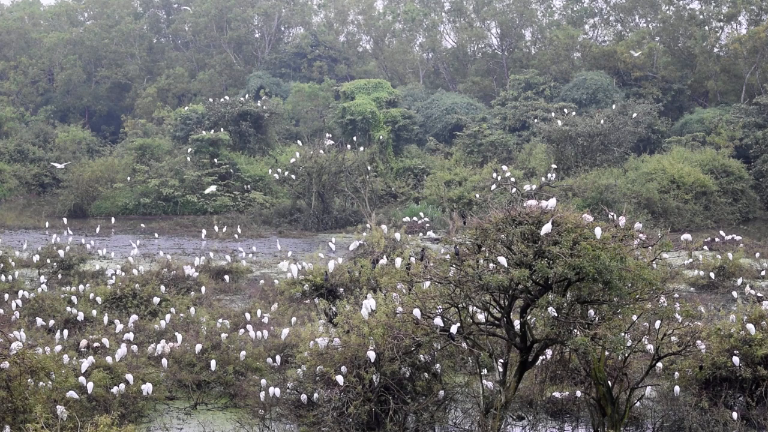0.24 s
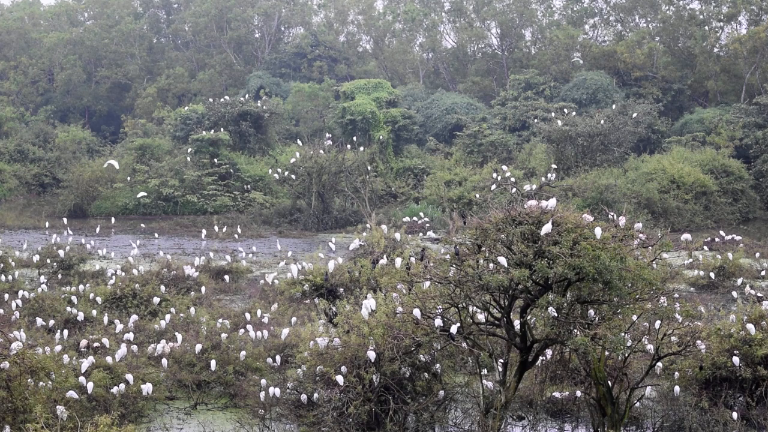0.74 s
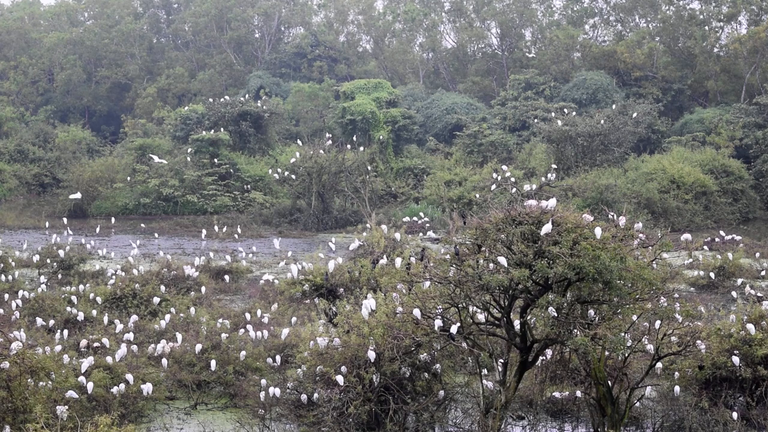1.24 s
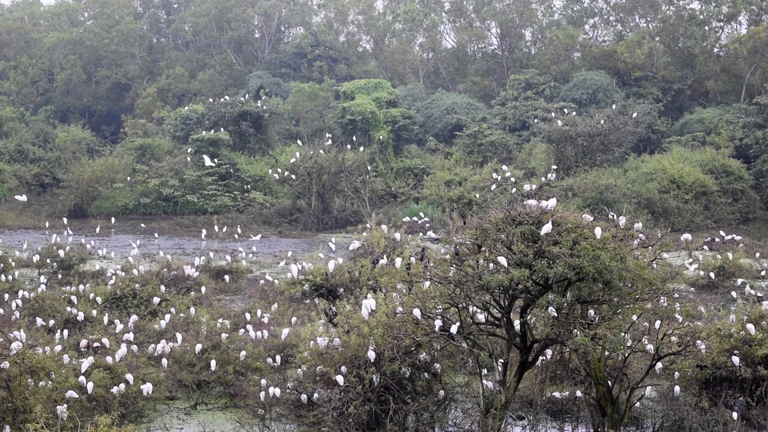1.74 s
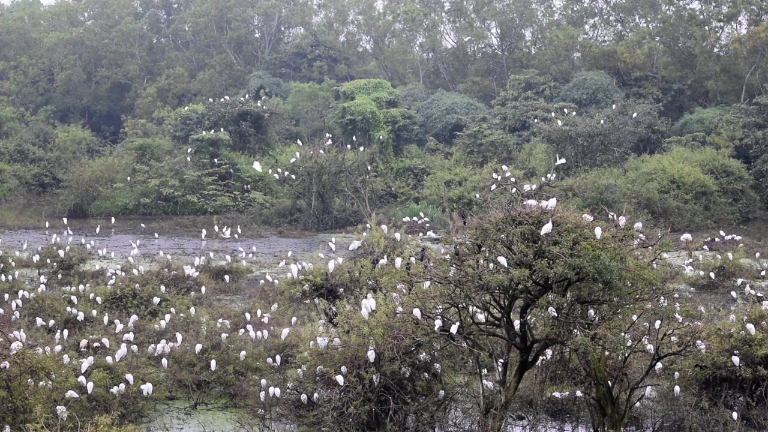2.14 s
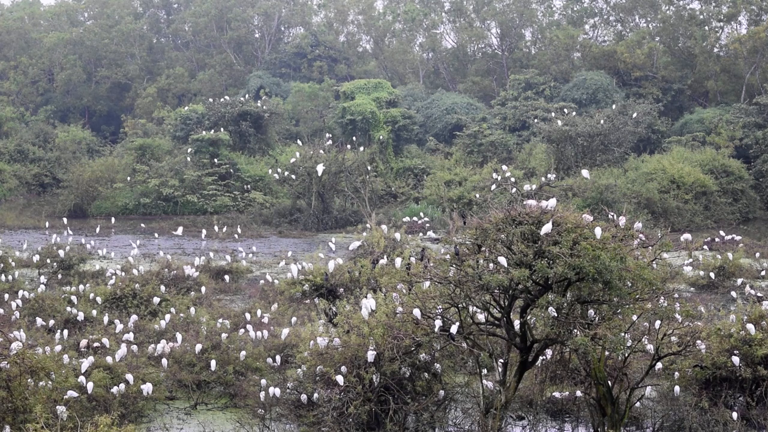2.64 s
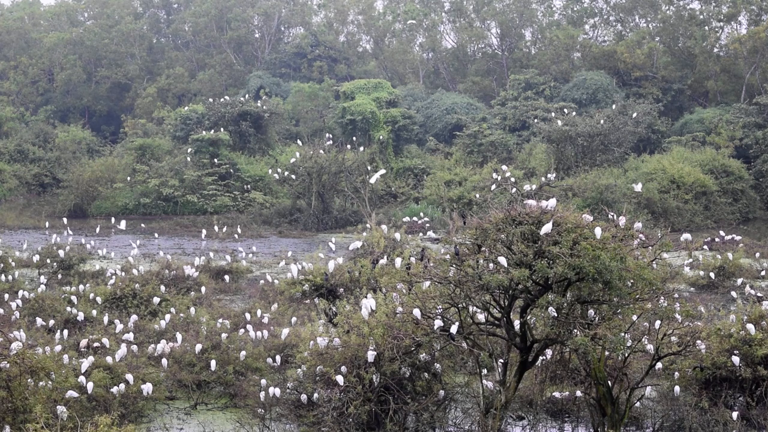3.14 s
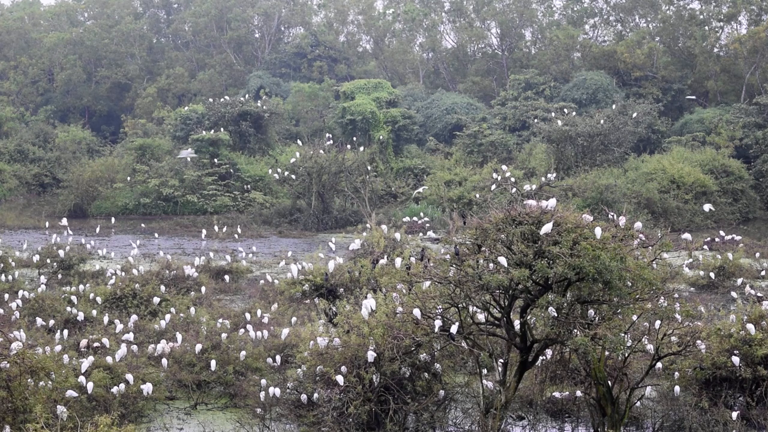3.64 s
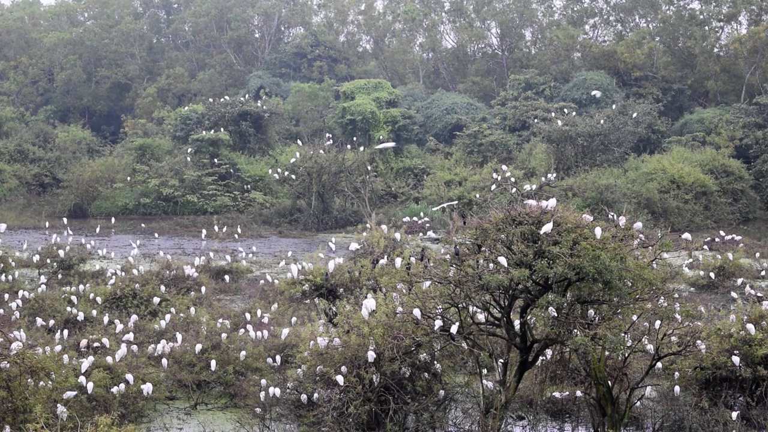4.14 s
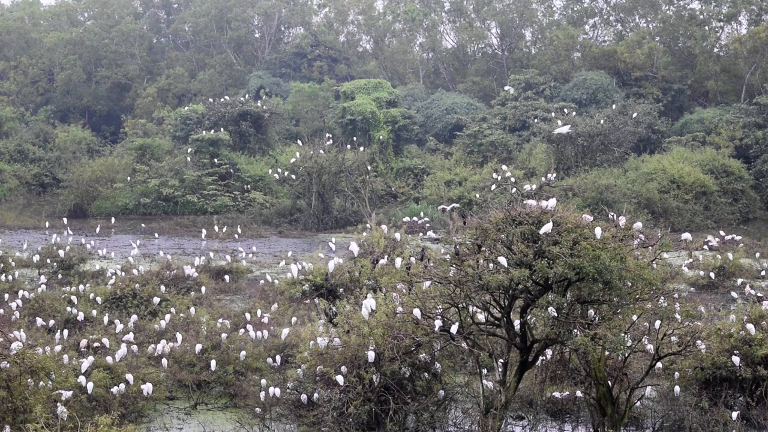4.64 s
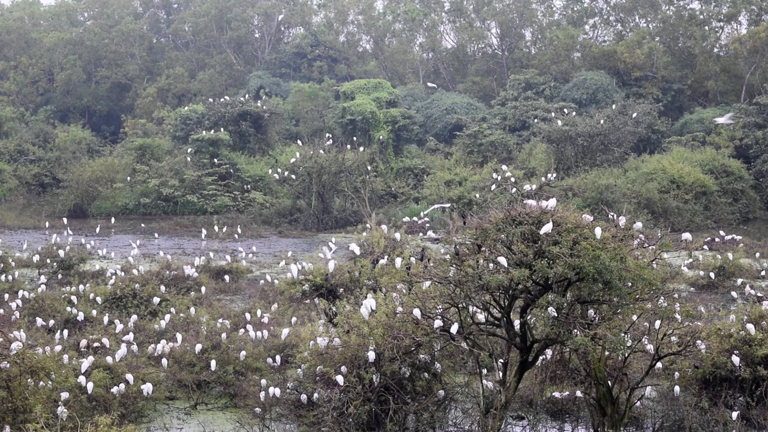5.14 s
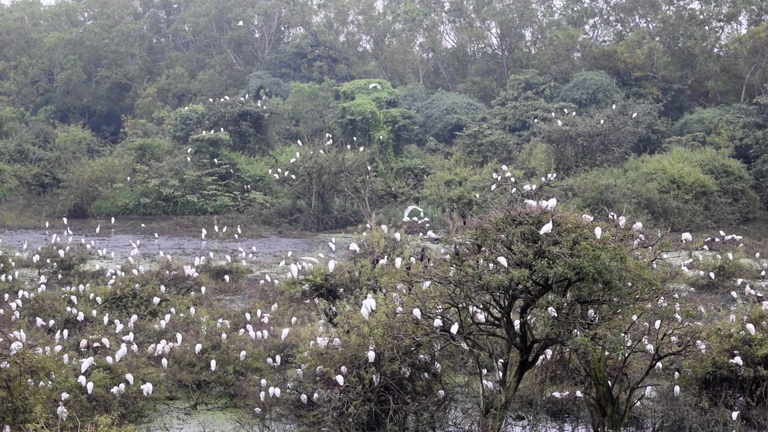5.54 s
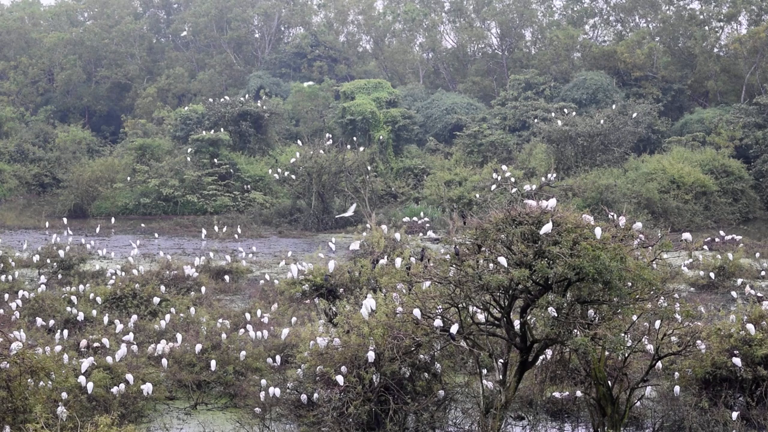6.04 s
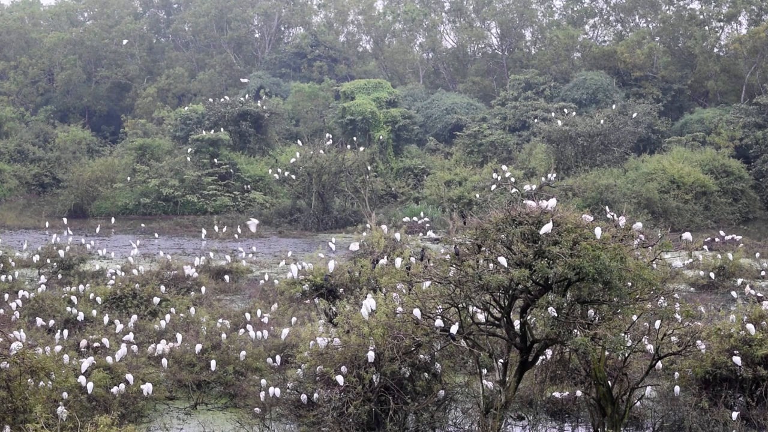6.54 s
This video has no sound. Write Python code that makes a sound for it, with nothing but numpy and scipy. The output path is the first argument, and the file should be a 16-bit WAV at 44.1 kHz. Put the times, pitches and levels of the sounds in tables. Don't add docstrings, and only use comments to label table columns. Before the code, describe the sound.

Outdoor stereo of a dense waterbird colony in wet scrub. Throaty gulps, croaks, chick rasps and brief squeaky cries scatter irregularly over a steady distant clamour and buzzing insects. The calling surges around the middle, when one close heron starts a rapid croaking series, loudest on its first notes then steady to the end. A second, milder flurry rises near the close. Very light wind and faint leaf rustle, no close handling noise.

```python
import sys
import numpy as np
from scipy import signal
from scipy.fft import rfft, irfft, next_fast_len
from scipy.io import wavfile
from scipy.ndimage import uniform_filter1d, map_coordinates

SR = 44100
rng = np.random.default_rng(int(sys.argv[2]) if len(sys.argv) > 2 else 0)


def volts_from_decibels(level):
    exponent = np.asarray(level, float) / 20
    return 10 ** exponent


def master_out(mix):
    frames = np.transpose(np.atleast_2d(mix))
    ceiling = np.clip(frames, -1, 1)
    pcm = np.round(ceiling * 32767).astype(np.int16)
    wavfile.write(sys.argv[1], SR, pcm)


N = 298998
SAG_PER_S = 0.284


def unit(x):
    return x / np.sqrt(np.mean(x ** 2, axis=-1, keepdims=True) + 1e-20)


def along(points, hz):
    f, v = np.transpose(points)
    return np.interp(np.log(hz + 1), np.log(f + 1), v)


def curves(rows):
    s, *cols = np.transpose(rows)
    return [np.interp(np.arange(N) / SR, s, c) for c in cols]


def wobble(rate):
    knots = rng.standard_normal(int(N * rate / SR) + 4)
    return map_coordinates(knots, [np.arange(N) * rate / SR])


def filtered(x, response):
    n = x.shape[-1]
    m = next_fast_len(n + 2048)
    return irfft(rfft(x, m) * response(np.fft.rfftfreq(m, 1 / SR)), m)[..., :n]


def ring(f, hz, width):
    return 1j * f * width / (hz * hz - f * f + 1j * f * width)


def place(rows, start_s):
    first = np.round(np.reshape(start_s, (-1, 1)) * SR).astype(int)
    at = first + np.arange(rows.shape[1]) + SR
    return np.bincount(at.ravel(), rows.ravel(), N + 2 * SR)[SR:SR + N]


def spread(a, b):
    # pitch_hz, likeness (0 to 1)
    likeness = [(60, 1), (150, 0.82), (330, 0.88), (700, 0.89), (1300, 0.99), (2380, 0.89), (5980, 0.8),
                (15000, 0.32)]
    turn = lambda hz: np.arccos(np.clip(along(likeness, hz), -1, 1)) / 2
    weights = lambda hz: np.array([np.cos(turn(hz)), np.sin(turn(hz))])
    mid, side = filtered(np.array([a, b]), weights)
    return np.array([mid + side, mid - side])


def scrub(x, t60, wet_db):
    t = np.arange(SR // 2) / SR
    fade = volts_from_decibels(-60 * t / t60) * (1 - np.exp(-t / 0.01))
    tail = rng.standard_normal((2, len(t))) * fade
    wet = signal.fftconvolve(x[None], tail / np.linalg.norm(tail[0]), axes=1)[:, :N]
    return x + volts_from_decibels(wet_db) * spread(*wet)


def croaks(middle, length, db, mouth_hz, throat_db, rasp_db, pitch_hz, rough, jitter, q, glide, size=9216):
    # pitch_hz, width_hz, level_db
    bill_path = [(5200, 740, 7), (6900, 3400, -6.5), (9600, 400, -10.5)]
    col = lambda v: np.reshape(v, (-1, 1))
    u = np.clip(np.arange(size) / SR / col(length), 0, 1)
    chance = rng.standard_normal((len(middle), 3, size))

    drift = unit(uniform_filter1d(chance[:, 0], size=200, axis=1))
    pulse_hz = col(pitch_hz) * (1.08 - .16 * u) * volts_from_decibels(jitter * drift)
    cycles = np.cumsum(pulse_hz, axis=1) / SR
    pulses = unit(np.diff(np.floor(cycles), prepend=0) * volts_from_decibels(1.5 * chance[:, 1]))
    breath = unit(chance[:, 2] * np.exp(-1.8 * (cycles % 1)))
    swell = np.sin(np.pi * u ** .57) ** 2
    source = swell * (np.sqrt(1 - rough) * pulses + np.sqrt(rough) * breath)

    mouth = lambda k: lambda f: ring(f, k * col(mouth_hz), col(mouth_hz / q)) ** 2 / (1 + (f / 8500) ** 6)
    voice = filtered(source * (1 - u), mouth(1 + glide)) + filtered(source * u, mouth(1 - glide))

    throat_path = lambda f: ring(f, .5 * col(mouth_hz), 240) ** 2 + 0.32 * ring(f, 696, 400) ** 2
    throat = filtered(source * (1.1 - u) ** 3, throat_path)

    windpipe = lambda f: sum((-1) ** k * volts_from_decibels(g) * ring(f, c, w) for k, (c, w, g) in enumerate(bill_path))
    bill = filtered(swell * breath, lambda f: windpipe(f) * ring(f, 10400, 7000) / (1 + (f / 11800) ** 8))

    call = unit(voice) + volts_from_decibels(col(throat_db) + 1.0) * unit(throat) + volts_from_decibels(col(rasp_db) - 2.5) * unit(bill)
    filled = np.sqrt(.36 * col(length) * SR / size)
    return place(call * volts_from_decibels(col(db)) * filled, middle - .37 * length)


def squeals(middle, length, db, start_hz, end_hz, waver=.011, flutter_db=4.0, size=8200):
    u = np.clip(np.arange(size) / SR / length[:, None], 0, 1)
    shake = uniform_filter1d(rng.standard_normal((len(middle), 2, size)), size=300, axis=2)
    shake = unit(uniform_filter1d(shake, size=60, axis=2))
    glide_hz = start_hz[:, None] * (1 - u) + end_hz[:, None] * u
    phase = 2 * np.pi * np.cumsum(glide_hz * (1 + waver * shake[:, 0]), axis=1) / SR
    note = (np.sin(phase) + 0.076 * np.sin(2 * phase)) * volts_from_decibels(flutter_db * shake[:, 1])
    swell = np.abs(np.sin(np.pi * u)) ** 1.3
    return place(volts_from_decibels(db[:, None] - 3.0) * swell * note, middle - .5 * length)


def near_adult():
    # middle_s, level_db, mouth_hz
    run = [(3.575, -28, 2150), (3.732, -26.5, 2090), (3.88, -30.5, 1876), (4.03, -31, 1730),
           (4.181, -35.5, 1780), (4.329, -35.5, 1610), (4.482, -35.5, 1600), (4.646, -37, 1625),
           (4.809, -36, 1640), (4.985, -37.5, 1610), (5.155, -34.5, 1710), (5.319, -38, 1640),
           (5.512, -37.5, 1600), (5.696, -37.5, 1674), (5.902, -38, 1586), (6.088, -38.5, 1590),
           (6.25, -36, 1760), (6.45, -36, 1660), (6.645, -36.5, 1590)]
    s, db, mouth_hz = np.transpose(run)
    effort_db = db + 28.5
    length_s = .08 - .004 * effort_db
    first_rasp_db, last_rasp_db, rasp_fade_s = -16, -31, .22
    rasp_db = last_rasp_db + (first_rasp_db - last_rasp_db) * np.exp(-(s - s[0]) / rasp_fade_s)
    pitch_hz = 137 * volts_from_decibels(rng.normal(0, 0.45, len(s)))
    tightness = 7 * volts_from_decibels(0.34 * effort_db)
    adult = croaks(s, length_s, db, mouth_hz, -16.5, rasp_db, pitch_hz,
                   rough=.2, jitter=0.49, q=tightness, glide=.068, size=6144)
    return adult + volts_from_decibels(-19) * np.roll(adult, round(.085 * SR))


def neighbours():
    # middle_s, length_s, level_db, mouth_hz, throat_db
    answers = [(0.114, 0.055, -41, 1670, -10), (0.122, 0.055, -40, 1330, -22),
               (0.282, 0.053, -39.5, 1810, -13), (0.517, 0.065, -48, 1650, -8),
               (0.655, 0.09, -43, 1540, -8.5), (0.828, 0.048, -45, 1430, -13),
               (0.83, 0.075, -39, 2930, -25), (0.901, 0.084, -39, 2860, -23),
               (0.917, 0.059, -41, 2020, -7.5), (1.051, 0.086, -41, 1680, -10),
               (1.3, 0.099, -39.5, 2660, -12), (1.635, 0.048, -42.5, 1480, -12),
               (1.861, 0.037, -44, 1550, -24), (1.979, 0.051, -41.5, 1630, -11),
               (2.149, 0.15, -43, 2280, -27), (2.305, 0.088, -37, 1500, -16.5),
               (2.436, 0.062, -41, 1540, -21), (2.614, 0.12, -38, 2590, -14), (2.894, 0.21, -42, 1980, -10),
               (2.992, 0.13, -52, 1190, -4), (3.058, 0.18, -43.5, 2160, -17),
               (3.273, 0.062, -43, 1460, -20), (3.39, 0.14, -44, 1880, -20), (3.425, 0.23, -44, 1250, -11),
               (3.68, 0.13, -37, 2700, -30), (4.221, 0.21, -42.5, 1330, -26),
               (4.384, 0.092, -37.5, 2820, -22), (4.397, 0.2, -46, 1320, -19),
               (4.916, 0.11, -41, 2580, -25), (4.925, 0.12, -46.5, 1450, -23),
               (5.102, 0.088, -40, 2300, -25), (5.379, 0.11, -44, 1310, -16),
               (5.566, 0.098, -46.5, 1310, -22), (1.349, .12, -46, 1740, -6), (2.22, 0.078, -43, 1800, -22),
               (.63, 0.087, -45, 2350, -23), (6.178, 0.058, -54, 3000, -25), (6.241, 0.11, -44, 2940, -23),
               (6.454, 0.087, -42, 2520, -28), (6.571, 0.14, -39.5, 2770, -11)]
    pitch_hz = 230 * volts_from_decibels(rng.normal(0, 2.3, len(answers)))
    return croaks(*np.transpose(answers), -28, pitch_hz, rough=.22, jitter=0.33, q=3.5, glide=0.01)


def chicks():
    # middle_s, level_db, mouth_hz, rasp_db
    begging = [(0.14, -49, 5800, -26), (0.25, -52, 5900, -26), (0.32, -49, 5900, -26),
               (0.37, -45, 5900, -26), (0.4, -44, 4800, -26), (1.043, -42.5, 4200, -12),
               (1.304, -50, 3990, -6), (1.501, -42.5, 3950, -6.5), (1.775, -47, 3510, -3),
               (1.974, -51, 3700, -1), (2.135, -54, 3800, -10), (2.3, -45, 4200, -8),
               (2.502, -42.5, 3800, -4), (2.664, -44.5, 3830, -7), (2.881, -43.5, 3440, -13),
               (3.562, -35, 3370, -2), (3.586, -44.5, 4600, 4), (3.63, -46, 5640, -6),
               (3.5, -50, 5640, -16), (3.68, -52, 6040, -3), (3.74, -49.5, 5300, 7), (3.8, -53, 5700, -3),
               (3.869, -47.5, 5200, -5), (3.93, -63, 5300, -6), (4.04, -46.5, 4810, -15),
               (4.505, -60, 4024, -16), (4.695, -47, 4040, -3), (4.883, -45, 3980, -3),
               (5.097, -57, 3890, -14), (5.312, -42, 3800, -11), (5.544, -50, 5800, -16),
               (5.781, -41.5, 4100, -12), (5.927, -43, 4280, -13), (6.61, -47, 4400, -18)]
    s, db, mouth_hz, rasp_db = np.transpose(begging)
    pitch_hz = 480 * volts_from_decibels(rng.normal(0, 2.4, len(s)))
    return croaks(s, np.full(len(s), .13), db, mouth_hz, -11.5, rasp_db, pitch_hz,
                  rough=.6, jitter=1.1, q=3.7, glide=0.042, size=6400)


def clear_cries():
    # middle_s,
    # length_s, level_db, start_hz
    sagging = [(0.052, 0.038, -39, 3130), (0.116, 0.06, -39.5, 1250), (0.157, 0.21, -54.5, 357),
               (.29, .05, -46, 2060), (0.438, 0.071, -40, 3120), (0.037, .06, -47, 1254),
               (0.303, 0.087, -53, 699), (.5, .04, -41, 2440), (.72, .05, -44, 2500),
               (1.331, 0.12, -57, 445), (1.558, .1, -59, 429), (2.195, .07, -57, 447),
               (.57, .06, -42, 1960), (0.818, 0.059, -39, 1325), (1.12, 0.065, -57, 493),
               (1.198, 0.052, -36.5, 3110), (1.265, 0.061, -41, 3150), (1.641, 0.042, -40.5, 1410),
               (1.966, .05, -41, 3650), (2, 0.13, -39.5, 2947), (2.13, 0.083, -37, 3190),
               (2.284, 0.046, -33, 2535), (2.485, .035, -34, 2370), (2.515, 0.039, -34.5, 2340),
               (2.63, 0.054, -36.5, 2470), (2.715, .05, -39, 2040), (2.985, 0.052, -39.5, 1118),
               (3.45, 0.091, -44, 1170), (3.536, 0.024, -38.5, 1076), (3.65, 0.069, -37, 3980),
               (3.881, 0.033, -42, 2030), (4.262, 0.04, -36, 2040), (4.387, .05, -43, 2610),
               (4.693, 0.085, -43, 2810), (3.827, 0.063, -39, 2000), (3.95, .07, -37, 1920),
               (5.47, 0.037, -37, 1950), (5.778, 0.041, -47, 990), (5.907, 0.044, -40, 2080),
               (6.632, .04, -38, 2350), (5.923, 0.11, -45, 1280), (6.08, 0.044, -41, 980),
               (6.714, .05, -40, 2053)]
    # middle_s, length_s, level_db, start_hz, end_hz
    gliding = [
        (0.279, 0.072, -34, 1900, 2140),
        (1.035, 0.12, -35, 2330, 1837),
        (1.16, 0.055, -40, 1680, 1875),
        (2.077, 0.067, -44, 3400, 3700),
    ]
    s, length, db, hz = np.transpose(sagging)
    notes = squeals(s, length, db, hz, hz * (1 - SAG_PER_S * length))
    return notes + squeals(*np.transpose(gliding), waver=0.0035, flutter_db=1.5, size=6000)


def near_birds():
    others = neighbours() + chicks() + clear_cries()
    return scrub(near_adult(), t60=0.3, wet_db=-3.5) + scrub(others, t60=0.26, wet_db=-5.5)


def low_voices():
    # start_s, peak_db, throat_hz
    gulp_times = [(0.109, -39, 770), (0.25, -42, 1040), (0.511, -41, 855), (0.632, -52, 1050),
                  (0.824, -45, 840), (1.023, -39, 1090), (1.53, -43, 930), (1.607, -44, 684),
                  (1.736, -44, 1050), (1.857, -57, 1010), (1.96, -35, 1040), (2.08, -42, 969),
                  (2.156, -41, 990), (2.296, -44, 1070), (2.416, -37.5, 912), (2.541, -41, 918),
                  (2.641, -44, 1040), (2.835, -42, 930), (2.937, -39, 972), (3.072, -50, 920),
                  (3.228, -39, 950), (3.348, -47, 953), (3.535, -37, 1090), (3.698, -33.5, 1060),
                  (3.834, -35, 968), (3.898, -35, 1000), (4.02, -30, 1003), (4.162, -35, 940),
                  (4.23, -40, 1077), (4.316, -33.5, 970), (4.457, -39, 930), (4.582, -45, 1040),
                  (4.647, -37, 1070), (4.96, -39, 835), (5.129, -41, 990), (5.192, -55, 890),
                  (5.335, -41, 980), (5.559, -51, 1004), (5.654, -42, 860), (5.796, -48, 1070),
                  (5.883, -37, 1025), (5.964, -40, 1090), (6.069, -40, 987), (6.234, -38, 991),
                  (6.403, -40, 706), (6.581, -37, 1070)]
    # start_s, peak_db, pitch_hz
    hoot_times = [(0.209, -54, 333), (0.339, -70, 495), (0.886, -51, 393), (1.035, -57, 367),
                  (1.604, -52, 340), (1.892, -59, 550), (2.336, -58, 423), (2.55, -54, 447),
                  (2.724, -53, 420), (2.921, -43, 539), (3.325, -49, 447), (3.557, -51, 456),
                  (3.687, -55, 562), (3.784, -49, 432), (3.892, -45, 515), (4.038, -59, 456),
                  (4.338, -53, 453), (5.015, -51, 450), (5.175, -59, 486), (5.424, -53, 359),
                  (5.683, -50, 450), (5.826, -53, 441), (5.989, -54, 427), (6.266, -51, 455),
                  (6.537, -58, 328), (6.642, -53, 432)]
    gulp_s, hoot_s = 0.0517, 0.0915
    s, db, hz = np.transpose(gulp_times)
    pitch_hz = 150 * volts_from_decibels(rng.normal(0, 1.5, len(s)))
    gulps = croaks(s + .3 * gulp_s, np.full(len(s), gulp_s), db - 9.5, hz, -17.5, -47, pitch_hz,
                   rough=0.33, jitter=.45, q=4.2, glide=0.031, size=4096)
    s, db, hz = np.transpose(hoot_times)
    hoots = squeals(s + 0.46 * hoot_s, np.full(len(s), hoot_s), db - 8, hz, hz * (1 - SAG_PER_S * hoot_s),
                    waver=0.021, size=5000)
    return scrub(gulps + hoots, t60=0.2, wet_db=-3.5)


def far_crowd(count=85):
    chance = lambda: rng.random(count)
    bell = lambda: rng.standard_normal(count)
    crowd = croaks(chance() * N / SR, .05 + .05 * chance(), 3.2 * bell(), 700 * 9.65 ** chance(),
                   np.full(count, -8), -14 + 3 * bell(), 230 * volts_from_decibels(3.5 * bell()),
                   rough=0.54, jitter=.5, q=3.6, glide=0.067, size=5000)
    hz = 800 * 8 ** chance()
    notes = squeals(chance() * N / SR, .04 + .06 * chance(), 0.24 * bell(), hz, hz * (.98 + 0.0456 * bell()),
                    size=4600)
    return scrub(volts_from_decibels(-18) * unit(crowd) + volts_from_decibels(-23) * unit(notes), t60=.4, wet_db=-1.5)


def haze():
    z = signal.stft(rng.standard_normal((2, N)), nperseg=512)[2]
    patches = uniform_filter1d(rng.standard_normal(z.shape[1:]), size=4, axis=0)
    patches = uniform_filter1d(patches, size=10, axis=1)
    noise = signal.istft(z * volts_from_decibels(1.74 * patches / patches.std()), nperseg=512)[1][:, :N]
    return spread(*unit(noise))


def far_colony():
    # time_s, stir_db
    stirring = [(0, 0), (.32, 1.2), (.7, -2), (1.44, -4), (1.9, 2), (2.2, 1.4), (2.779, -4), (2.95, -0.5),
                (3.31, -1), (3.7, 6.5), (4.1, 3), (5.76, 2.5), (6, -1), (6.3, 4), (6.78, 2.5)]
    # pitch_hz, level_db (per Hz)
    colour = [(65, -36), (110, -44), (423, -15.5), (566, -18), (1880, -5), (2320, -6), (2910, -5),
              (3440, -11), (5100, -15.5), (7560, -31.5), (8740, -29), (10500, -42.5), (11900, -44.5),
              (15600, -66)]
    # level_db, follow (dB per dB of stir)
    sizes = [
        (-52, 0.29),
        (-43, 0.5),
        (-44, 0.62),
        (-55, 0.5),
    ]
    mix = haze() + far_crowd()
    cuts = [0, 1300, 2900, 5300, SR]  # Hz, between the sizes
    over = lambda f, hz: 1 / (1 + (hz / (f + 1)) ** 8)
    stir_db, = curves(stirring)
    din = 0
    for (db, follow), lo, hi in zip(sizes, cuts, cuts[1:]):
        layer = filtered(mix, lambda f: volts_from_decibels(along(colour, f)) * (over(f, lo) - over(f, hi)))
        din = din + volts_from_decibels(db + follow * stir_db) * unit(layer)
    return din


def singer(db, hz, beat_hz, sharp, width_hz, drift):
    beat = np.cumsum(beat_hz * volts_from_decibels(drift * wobble(9.8))) / SR
    gate = (.5 + .5 * np.cos(2 * np.pi * beat)) ** sharp + .3
    slow = filtered(rng.standard_normal((4, N)), lambda f: 1 / (1 + (f / width_hz) ** 4))
    phase = 2 * np.pi * np.cumsum(hz) / SR
    pair = slow[:2] * np.cos(phase) + slow[2:] * np.sin(phase)
    return volts_from_decibels(db) * unit(spread(*(gate * pair)))


def cicadas():
    # time_s, level_db
    drone_level = [(0, -48.5), (.34, -51), (.43, -42), (.62, -46.5), (.92, -46.5), (1.05, -49.5),
                   (1.62, -47), (2.25, -47.5), (2.53, -42), (2.72, -46.5), (3.23, -48), (3.66, -55),
                   (3.96, -62), (4.25, -47), (4.53, -68), (5.15, -57), (5.4, -63), (6.78, -59)]
    # pitch_hz, width_hz, level_db
    overtones = [
        (8730, 350, -67.5),
        (11740, 310, -75.5),
    ]
    db, = curves(drone_level)
    drum_hz = 2920 + 49.7 * wobble(5.5)
    drone = singer(db + 1.5 + 1.5 * wobble(22), drum_hz, beat_hz=140, sharp=1.1, width_hz=215, drift=1.5)
    whine = sum(singer(level_db + 0.35 * wobble(1.4), np.full(N, hz), beat_hz=136.0, sharp=0.22,
                       width_hz=.5 * width, drift=1.0) for hz, width, level_db in overtones)
    return drone + whine


def crickets():
    # start_s, end_s, level_db, climb_hz
    phrases = [(-.1, .08, -46, 132), (0.178, .626, -47, 59.8), (0.951, 1.271, -51.5, 327),
               (1.45, 2.18, -48, 169.5), (2.402, 2.74, -46, 90.6), (2.853, 3.398, -50, 372),
               (3.37, 3.615, -46.5, 70), (3.63, 4.15, -50.5, 398), (4.095, 4.47, -45.5, 59.6),
               (4.606, 4.961, -54, 384), (4.925, 5.301, -47, 80), (5.301, 5.65, -49.5, 455),
               (5.825, 6.402, -48, 252)]
    t, swell, wing_hz = np.arange(N) / SR, np.full(N, 1e-4), np.zeros(N)
    for start, end, level_db, climb_hz in phrases:
        u = np.clip((t - start) / (end - start), 0, 1)
        phrase = volts_from_decibels(level_db) * np.abs(np.sin(np.pi * u)) ** 0.431
        arch = np.sin(np.pi * .7 * u)
        wing_hz = np.where(phrase > swell, 4884 + climb_hz * arch, wing_hz)
        swell = np.maximum(swell, phrase)
    return swell * singer(0, np.maximum(wing_hz, 4800), beat_hz=52, sharp=.45, width_hz=185, drift=.6)


def katydid():
    # time_s, level_db
    ticks = [(.55, -80), (2.82, -82), (2.92, -81), (3.06, -81), (3.16, -78), (3.27, -80), (3.36, -82),
             (3.44, -80)]
    tick_s, tick_hz = .014, 14800
    t = np.arange(N) / SR
    rasp = filtered(rng.standard_normal((2, N)), lambda f: ring(f, tick_hz, 3000) ** 3)
    return sum(volts_from_decibels(db) * np.exp(-((t - s) / tick_s) ** 2) for s, db in ticks) * unit(spread(*rasp))


def wind():
    # time_s, level_db
    gusts = [(.12, -72), (.21, -76), (.44, -68), (5.17, -89), (5.821, -77), (6.18, -72.5), (6.4, -79)]
    puff_s, calm_db = 0.02, -91
    t = np.arange(N) / SR
    buffet = filtered(rng.standard_normal((2, N)), lambda f: ring(f, 68, 71) ** 3)
    puffs = sum(volts_from_decibels(db + 9.5) * np.exp(-np.abs(t - s) / puff_s) for s, db in gusts)
    return (volts_from_decibels(calm_db + 2.5 * wobble(4.2)) + puffs) * unit(buffet)


def murmur_and_leaves():
    # time_s, level_db
    murmur_level = [(0, -69), (1.6, -70), (2.2, -71.5), (6.78, -72)]
    # time_s, level_db
    leaf_level = [(0, -83.5), (2.2, -85), (3.6, -80), (4.42, -76), (6.1, -75), (6.31, -82), (6.78, -85)]
    murmur = filtered(rng.standard_normal((2, N)), lambda f: ring(f, 181, 180) ** 2)
    rustle = filtered(rng.standard_normal((2, N)), lambda f: ring(f, 11900, 5500) ** 2)
    murmur = volts_from_decibels(curves(murmur_level)[0]) * unit(spread(*murmur))
    return murmur + volts_from_decibels(curves(leaf_level)[0] + 6.5) * unit(rustle)


def scene():
    birds = near_birds() + low_voices() + far_colony()
    insects = cicadas() + crickets() + katydid()
    return birds + insects + wind() + murmur_and_leaves()


def roll_off(x):
    return signal.sosfilt(signal.butter(12, 15750, fs=SR, output="sos"), x)


def record(dry):
    low_cut = filtered(dry, lambda f: 1 / (1 + (40 / (f + 1)) ** 4))
    return roll_off(low_cut)


dry = scene()
out = record(dry)
master_out(out)
```